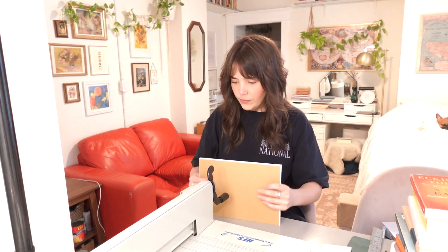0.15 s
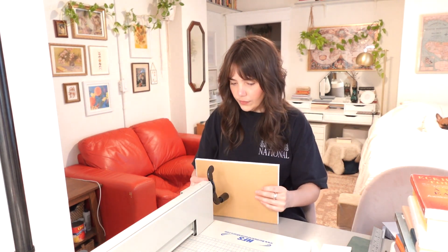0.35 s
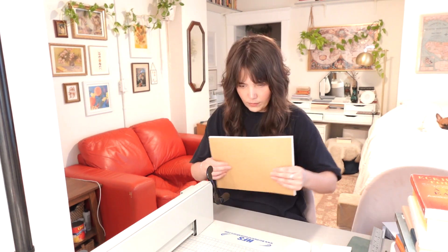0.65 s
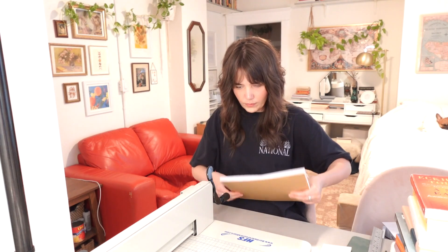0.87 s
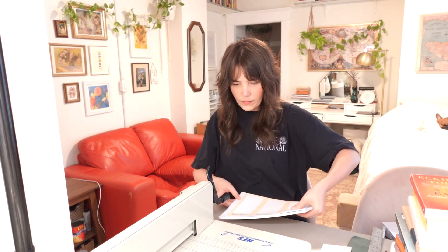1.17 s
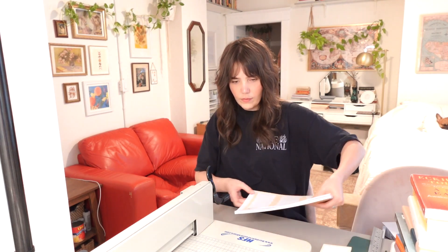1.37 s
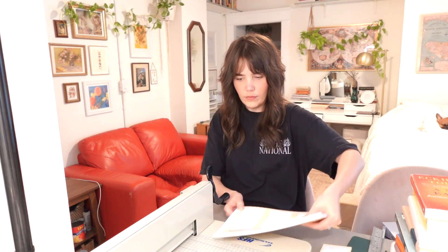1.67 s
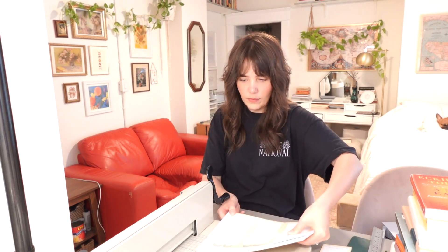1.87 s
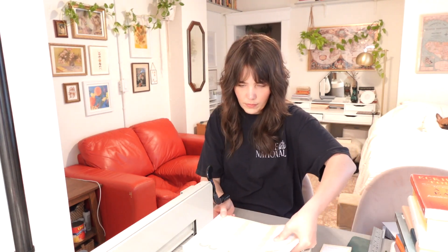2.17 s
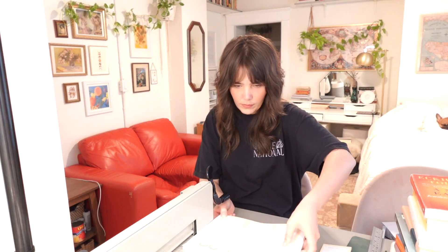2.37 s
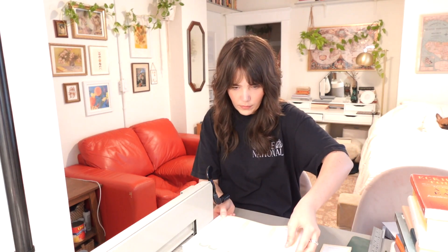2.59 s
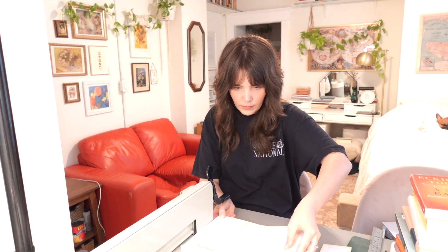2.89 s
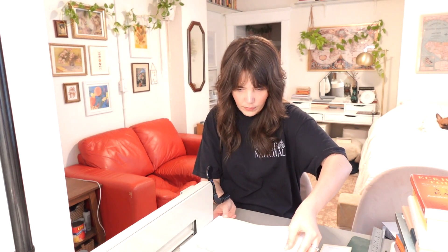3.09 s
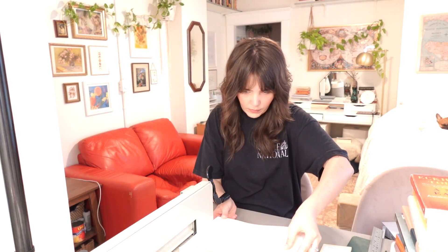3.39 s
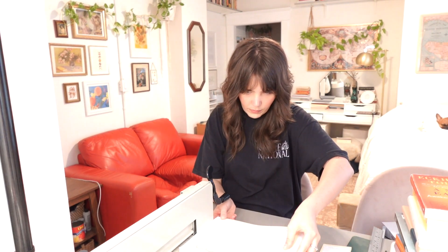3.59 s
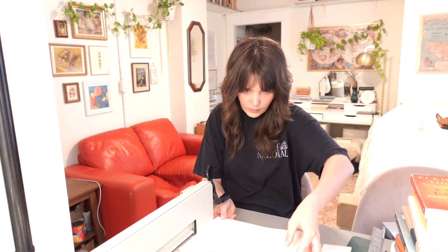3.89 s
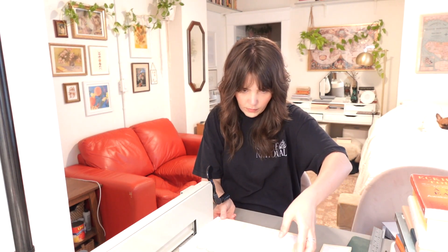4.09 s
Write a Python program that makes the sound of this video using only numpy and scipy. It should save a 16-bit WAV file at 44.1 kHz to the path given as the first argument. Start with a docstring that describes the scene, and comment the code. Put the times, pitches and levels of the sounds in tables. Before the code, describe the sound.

A stack of paper is handled on a desk in a small, quiet room, heard close and nearly mono. At about 0.2 seconds its edge cracks against the desk, and the desktop gives a dull, briefly ringing boom. A second knock at 0.7 seconds is dry and stops dead. From 0.8 to 2 seconds the sheets swish faintly as the stack is turned over, with a short rub near 1.8 seconds. At 2.2 seconds it lands flat with a crisp slap and a short room echo, followed at once by a light, hollow fingertip tap and soft sliding. Gentle pats come at about 2.8 and 3.1 seconds, with faint muffled bumps of the hand, then a firmer pat at 3.5 seconds. A last small tap and brush of paper come near 4 seconds. A faint, steady low room hum continues throughout.

```python
"""A desk in a small, quiet room, the microphone close and nearly mono.
A stack of paper is knocked twice on its edge: the first knock booms in the desk top, the second stops
dead. The sheets swish as the stack is turned over, it slaps down flat, and hand and fingertips pat it
square. A nearby surface and the room answer, over a steady low murmur."""
import sys
import numpy as np
from scipy import signal
from scipy.fft import rfft, irfft, next_fast_len
from scipy.io import wavfile
from scipy.ndimage import map_coordinates

SR = 44100
rng = np.random.default_rng(int(sys.argv[2]) if len(sys.argv) > 2 else 0)


def inscribe(sig):
    """Save sig as 16-bit PCM at rate SR to the path in sys.argv[1].

    A 1-D sig is mono; a 2-D sig holds one channel per row.
    Samples are clipped to [-1, 1] before scaling.
    """
    pcm = np.round(np.clip(np.atleast_2d(sig).T, -1, 1) * 32767)
    wavfile.write(sys.argv[1], SR, pcm.astype(np.int16))


N = 187199

# The dull boom of the desk top. Each row: frequency in Hz, level in dB.
BOOM_SPECTRUM = [(25, -27), (70, -27), (125, -0.5), (210, -4), (360, 3.5), (480, -3), (700, -2),
                 (1000, -4.5), (1500, -10), (3000, -18), (8000, -39.5)]


def edge_knocks(attack_s=0.0002, right_db=0.5):
    """Loose sheets land first with a hiss, then the whole edge cracks on the desk."""
    # Each row: start in seconds, level in dB, t60 in seconds, hiss and room in dB against the crack,
    # seconds until it stops dead.
    landings = [(0.1914, -24, 0.027, 1.5, -17, .8), (0.2002, -14, 0.017, -11.5, -0.5, .8),
                (0.6605, -24, 0.014, 7, -45, .0142), (0.666, -18, 0.019, -3, -43, 0.0086)]
    # The colours of crack and hiss. Each row: frequency in Hz, level in dB.
    crack_spectrum = [(30, -13.5), (150, 5), (400, -9), (700, 4), (1200, -5), (1900, 4), (2700, -2.5),
                      (3900, 3), (5500, -1), (7200, -4), (10000, -11.5), (16000, -31)]
    hiss_spectrum = [(100, -29), (900, 10.5), (2600, -29.5), (3600, 6), (4400, 12), (6500, 0), (9000, -15),
                     (16000, -53)]
    out = np.zeros((2, N))
    for start, db, t60, hiss_db, room_db, stop in landings:
        crack = sheet_volley(db, t60, shape(crack_spectrum), attack_s)
        hiss = sheet_volley(db + hiss_db, t60, shape(hiss_spectrum), attack_s)
        add(out, start, stopped(in_room(crack + hiss, room_db, build_s=0.011), stop))
    return out * amp([[-right_db], [right_db]])


def sheet_volley(db, t60, colour, attack_s):
    """Many sheets hit in a quick, dying volley and sound a body of the given colour."""
    t = np.arange(SR // 4) / SR
    fade = amp(db - 60 * t / t60)
    touching = (1 - np.exp(-t / attack_s)) / (1 + (t / t60) ** 4)
    volley = fade * rng.standard_normal(len(t))
    for _ in range(2):  # a blow this short feeds all frequencies evenly
        flat_spectrum = np.exp(1j * np.angle(rfft(volley)))
        volley = touching * irfft(flat_spectrum, len(t))
    volley = volley * np.linalg.norm(fade) / np.linalg.norm(volley)
    return coloured(np.pad(volley, (0, SR - len(t))), colour)


def desk_boom():
    """The stack's weight shakes the desk top: a few clear modes over a dense, dull boom."""
    # Each row: start in seconds, level in dB, swell, hold and t60 in seconds, ring in dB,
    # low cut in Hz, seconds until it stops dead.
    thuds = [(0.1995, -23.5, 0.0025, 0.038, 0.32, -10.5, 91, .8),
             (.667, -21, 0.002, 0.0054, 0.0063, -31, 107, 0.0064)]
    # Each row: frequency in Hz, level in dB, t60 in seconds before the thud's fade shortens it.
    desk_modes = [(147, 10.5, 0.14), (255, -22, .34), (340, 4, 0.57), (471, -8, 0.25), (528, 2, 0.35),
                  (670, -11, 0.16), (690, -8, 0.18), (940, -9, 0.26), (1060, -17, .3), (1280, 0.5, 0.4),
                  (1500, 2, 0.12)]
    out, t = np.zeros((2, N)), np.arange(SR) / SR
    for start, db, swell, hold, t60, ring_db, low_hz, stop in thuds:
        phases = rng.uniform(0, 2 * np.pi, len(desk_modes))
        ring = sum(amp(mode_db - 60 * t / mode_t60) * np.sin(2 * np.pi * hz * t + phase)
                   for (hz, mode_db, mode_t60), phase in zip(desk_modes, phases))
        press = np.minimum(t / swell, 1)
        fade = amp(-60 * np.maximum(t - hold, 0) / t60)
        boom = fade * noise(shape(BOOM_SPECTRUM))
        thud = amp(db) * press * (boom + amp(ring_db) * np.sqrt(fade) * ring)
        add(out, start, low_cut(stopped(thud, stop), low_hz))  # a brief blow moves little bass
    return out


def flat_slaps():
    """Broad blows over the whole stack: it lands flat, then the hand pats it."""
    # Each row: start in seconds, level in dB, t60 in seconds, treble corner in Hz, room in dB.
    slaps = [(2.2284, -27.5, 0.041, 1360, 5), (2.2332, -13.5, 0.026, 6340, -2),
             (2.833, -40, 0.039, 1400, -1), (3.454, -31, 0.037, 2440, -1.5)]
    # Each row: frequency in Hz, level in dB.
    slap_spectrum = [(30, -36), (100, -19.5), (170, -14.5), (260, -6.5), (380, -13), (470, -15),
                     (750, -5.5), (980, 0.5), (1350, -6.5), (1780, 5.5), (2300, -3.5), (3400, 1),
                     (4900, -0.5), (6000, -6.5), (10000, -14), (16000, -23)]
    return struck_stack(slaps, slap_spectrum, ring_db=3.5)


def fingertip_taps():
    """Fingertips strike the top sheet with a light, hollow tap."""
    # Each row: start in seconds, level in dB, t60 in seconds, treble corner in Hz, room in dB.
    taps = [(2.3518, -26, 0.085, 2860, -7.5), (3.087, -38.5, 0.075, 1640, -4),
            (3.978, -38.5, 0.065, 2050, -3)]
    # Each row: frequency in Hz, level in dB.
    tap_spectrum = [(30, -50), (210, -11), (480, -20.5), (720, -10), (980, 1), (1220, 6.5), (1550, -0.5),
                    (2200, -3), (2900, -9), (5000, -16), (16000, -15)]
    return struck_stack(taps, tap_spectrum, ring_db=0)


def struck_stack(blows, spectrum, ring_db, attack_s=0.0005):
    """Every blow carries the same few narrow resonant peaks, and a nearby surface repeats it at once."""
    # Each row: centre in Hz, half-width in Hz, level in dB.
    resonances = [(341.6, 18, 0), (590, 5.1, 10.5), (922, 39, 1), (1113, 41, -0.5), (1697, 23, -11),
                  (1800, 27, -18.5), (3400, 85, -16.5)]
    # Each row: delay in seconds, level in dB.
    reflections = [(.0056, -12)]

    def body(hz):
        peaks = sum(amp(db + ring_db) / (1 + ((hz - centre) / width) ** 2)
                    for centre, width, db in resonances)
        return shape(spectrum)(hz) * (1 + peaks)

    out = np.zeros((2, N))
    for start, db, t60, corner_hz, room_db in blows:
        colour = lambda hz: body(hz) / np.sqrt(1 + (hz / corner_hz) ** 4)
        hit = sheet_volley(db, t60, colour, attack_s)
        echo = sum(amp(echo_db) * np.pad(hit, (round(delay * SR), 0))[:SR]
                   for delay, echo_db in reflections)
        add(out, start, in_room(hit + echo, room_db))
    return out


def sheet_swish(grain_db=0.5):
    """Sheets brush each other in the hands, catching slightly as they go."""
    # Each row: fastest moment in seconds, level in dB, rise and fall in seconds.
    brushes = [(.3, -61, 0.33, 0.35), (.82, -55.5, 0.19, 0.18), (1.16, -65, 0.29, .22),
               (1.46, -61.5, 0.19, 0.3), (1.497, -55.5, .025, 0.043), (1.85, -64.5, .1, 0.43),
               (2.4, -56, .16, 0.22), (3.92, -62, 0.12, 0.12), (4.07, -67, 0.06, 0.13)]
    # Each row: frequency in Hz, level in dB.
    swish_spectrum = [(60, -15), (300, 6), (1500, -18), (4000, -3.5), (8000, -4), (13000, -6.5),
                      (16000, -8.5)]
    friction = noise(shape(swish_spectrum), size=N) * amp(grain_db * wobble(180))
    return strokes(brushes, rest_db=-71.0) * unit(friction)


def stack_slide(grain_db=1.26):
    """The stack rubs over the desk with a coarser catch."""
    # Each row: fastest moment in seconds, level in dB, rise and fall in seconds.
    slides = [(.01, -55.5, 0.16, 0.18), (.52, -65.5, 0.9, 0.51), (1.13, -68, 0.15, 0.35),
              (1.47, -64, 0.27, 0.32), (1.82, -54, .055, 0.18), (2.22, -56, 0.36, 0.67),
              (3.905, -60, 0.17, 0.23), (4.18, -68, 0.056, 0.069)]
    # Each row: frequency in Hz, level in dB.
    slide_spectrum = [(200, -9.5), (700, -3.5), (1200, -1), (1900, -1.5), (3000, -3), (5000, -6.5),
                      (7000, -15.5), (16000, -30)]
    friction = noise(shape(slide_spectrum), size=N) * amp(grain_db * wobble(90))
    return strokes(slides, rest_db=-70.5) * unit(friction)


def fingertip_drag(centre_hz=1200, width_hz=380):
    """Fingertips rub the top sheet in one narrow band of noise."""
    # Each row: fastest moment in seconds, level in dB, rise and fall in seconds.
    drags = [(1.47, -65, 0.13, 0.16), (1.838, -52, 0.055, 0.11)]
    friction = noise(lambda hz: 1 / (1 + ((hz - centre_hz) / width_hz) ** 2) ** 2, size=N)
    return strokes(drags, rest_db=-74.5) * friction


def strokes(rows, rest_db, drop_db=20, roundness=1.32):
    """Gain of rubbing: each stroke speeds up and slows down, over the stir of hands never quite at rest."""
    t = np.arange(N) / SR
    power = amp(rest_db) ** 2
    for fastest, db, rise, fall in rows:
        away = np.maximum((fastest - t) / rise, (t - fastest) / fall)
        power = power + amp(db - drop_db * away ** roundness) ** 2  # roundness 1 is pointed, 2 a bell
    return np.sqrt(power)


def hand_bumps(t60=0.34, attack_s=0.005, corner_hz=450):
    """The soft hand bumps the desk and stirs only the low part of its boom."""
    # Each row: start in seconds, level in dB.
    bumps = [(3.1, -58), (3.251, -56.5), (3.99, -61)]
    out, t = np.zeros((2, N)), np.arange(SR) / SR
    muffled = lambda hz: shape(BOOM_SPECTRUM)(hz) / (1 + (hz / corner_hz) ** 4)
    for start, db in bumps:
        envelope = amp(db - 60 * t / t60) * np.minimum(t / attack_s, 1)
        add(out, start, envelope * noise(muffled))
    return out


def in_room(x, room_db, build_s=0.0059):
    """A mono sound and its diffuse stereo tail, in which each frequency dies at its own speed."""
    # Each row: frequency in Hz, t60 in seconds.
    decay_times = [(100, 0.39), (300, 1), (800, 0.36), (2000, 0.34), (5000, 0.38), (13000, 0.27)]
    hz, t, spectra = signal.stft(noise(np.ones_like), SR, nperseg=256)
    decay = amp(-60 * t / along(decay_times, hz)[:, None])
    tail = signal.istft(spectra * decay, SR, nperseg=256)[1][:, :SR]
    tail *= 1 - np.exp(-(np.arange(SR) / SR / build_s) ** 2)
    tail /= np.linalg.norm(tail[0])
    return x + amp(room_db) * signal.fftconvolve(x[None], tail, axes=1)[:, :SR]


def room_tone(level_db=-62):
    """The steady murmur of the room and a faint hiss."""
    # Each row: frequency in Hz, level in dB.
    murmur_spectrum = [(15, -75), (25, -51), (59, -29), (116, -7), (137, -4.5), (200, -0.5), (241, 3.5),
                       (261, 0), (291, -4.5), (324, -5.5), (352, -5), (929, -12), (1180, -15),
                       (2150, -15.5), (15800, -48.5)]
    # Each row: frequency in Hz, side against middle in dB.
    murmur_width = [(60, -1), (240, -5.5), (950, -2.5), (3770, -4), (15000, -25)]
    return amp(level_db) * noise(shape(murmur_spectrum), size=N, width=murmur_width)


def noise(colour, size=SR, width=None):
    """Stereo noise of rms 1 in the given colour, nearly mono unless a width is given."""
    # The narrow image of a close source. Each row: frequency in Hz, side against middle in dB.
    close_width = [(100, -23), (300, -22), (700, -13), (2000, -8), (8000, -7)]
    padded = next_fast_len(size)
    hz = np.fft.rfftfreq(padded, 1 / SR)
    mid, side = rfft(rng.standard_normal((2, padded))) * colour(hz)
    side = side * shape(close_width if width is None else width)(hz)
    return unit(irfft([mid + side, mid - side], padded)[:, :size])


def coloured(x, colour):
    """x through a causal filter of the given colour, keeping the power of white noise."""
    size = 2 * SR
    gain = unit(colour(np.fft.rfftfreq(size, 1 / SR)))
    cepstrum = irfft(np.log(np.maximum(gain, 1e-6)))
    cepstrum[1:SR] *= 2  # minimum phase: nothing rings ahead of the blow
    cepstrum[SR + 1:] = 0
    return irfft(rfft(x, size) * np.exp(rfft(cepstrum)))[:len(x)]


def stopped(sound, after_s, release_s=0.00078):
    """A sound that stops dead after the given time."""
    t = np.arange(sound.shape[-1]) / SR
    return sound * (1 - np.tanh((t - after_s) / release_s)) / 2


def low_cut(x, hz):
    """x with the bass rolled off below hz."""
    return signal.sosfilt(signal.butter(2, hz, "high", fs=SR, output="sos"), x)


def wobble(rate):
    """A smooth random curve, rate knots a second."""
    knots = rng.standard_normal(int(N * rate / SR) + 4)
    return map_coordinates(knots, [np.arange(N) * rate / SR])


def shape(points):
    """(Hz, dB) points as a colour: gain as a function of frequency."""
    return lambda hz: amp(along(points, hz))


def along(points, hz):
    """(Hz, value) points read on a log axis."""
    point_hz, values = np.transpose(points)
    return np.interp(np.log(hz + 1), np.log(point_hz + 1), values)


def amp(db):
    """Decibels to gain."""
    return 10 ** (np.asarray(db) / 20)


def unit(x):
    """x at rms 1."""
    return x / np.sqrt(np.mean(x ** 2) + 1e-20)


def add(track, start_s, sound):
    """Mix a sound into the track."""
    part = track[:, round(start_s * SR):][:, :sound.shape[1]]
    part += sound[:, :part.shape[1]]


def scene(right_db=0.44):
    """Everything happens on the desk, a little right of centre."""
    blows = edge_knocks() + desk_boom() + hand_bumps() + flat_slaps() + fingertip_taps()
    rubbing = sheet_swish() + stack_slide() + fingertip_drag()
    return (blows + rubbing + room_tone()) * amp([[-right_db], [right_db]])


def record(dry, low_cut_hz=50, top_hz=15850):
    """The microphone sheds the deepest bass; the recorder keeps nothing above its band limit."""
    thinned = low_cut(dry, low_cut_hz)
    padded = next_fast_len(N + SR // 2)
    in_band = np.fft.rfftfreq(padded, 1 / SR) < top_hz
    return irfft(rfft(thinned, padded) * in_band, padded)[:, :N]


dry = scene()
out = record(dry)
inscribe(out)
```